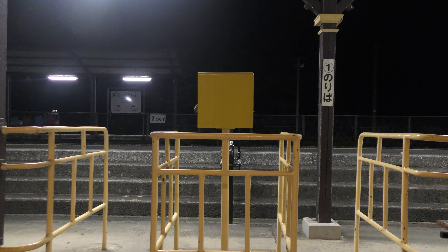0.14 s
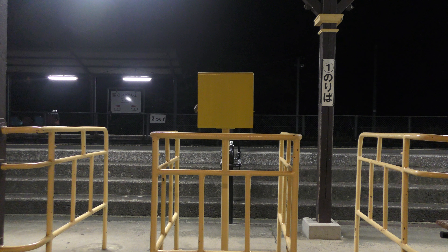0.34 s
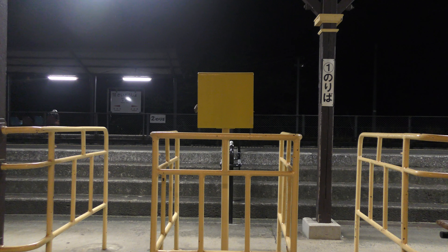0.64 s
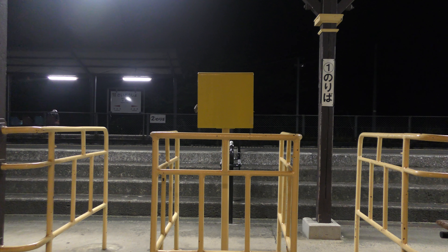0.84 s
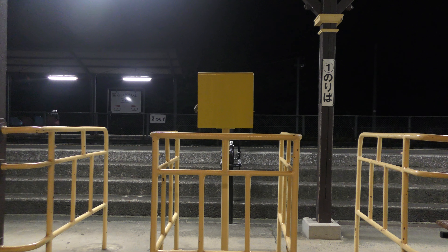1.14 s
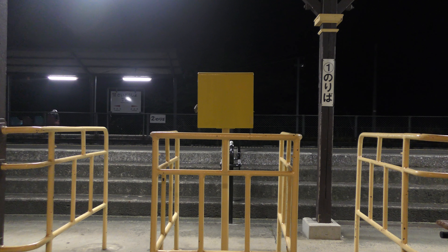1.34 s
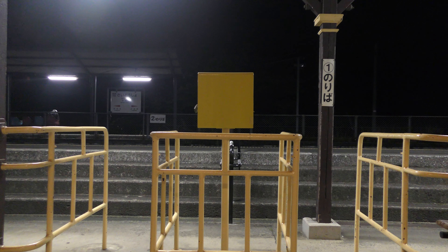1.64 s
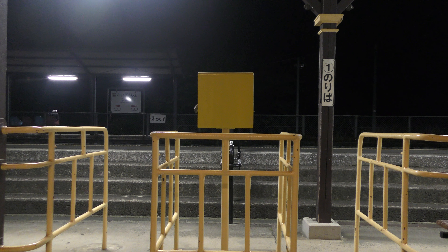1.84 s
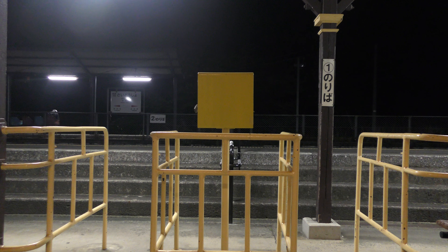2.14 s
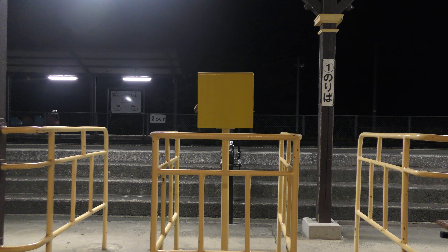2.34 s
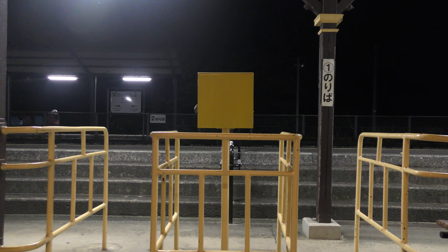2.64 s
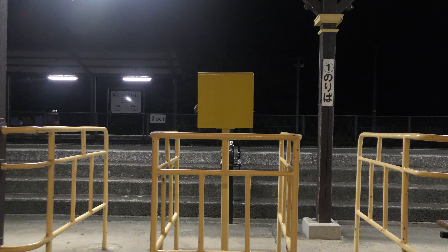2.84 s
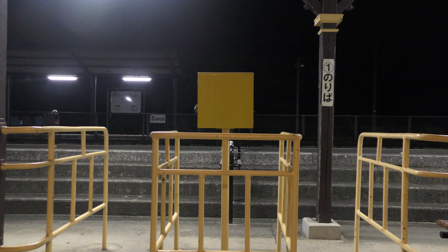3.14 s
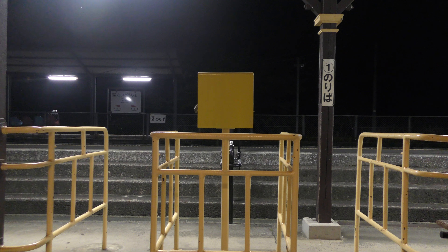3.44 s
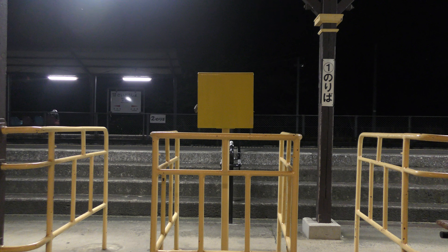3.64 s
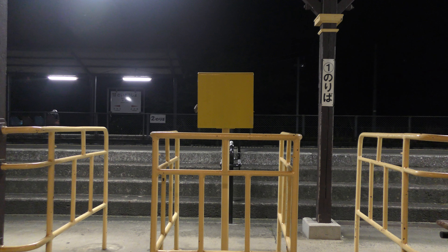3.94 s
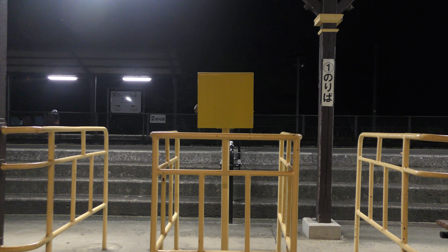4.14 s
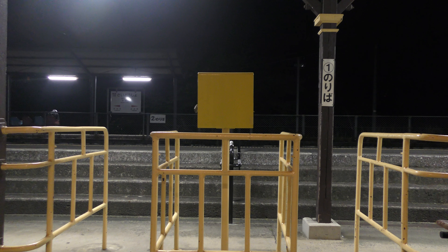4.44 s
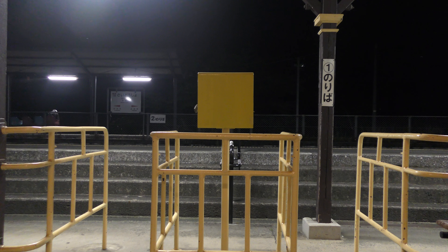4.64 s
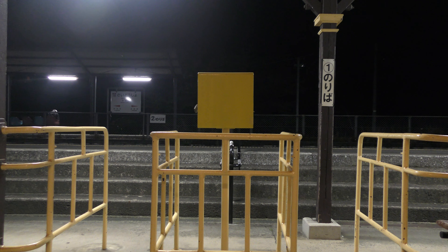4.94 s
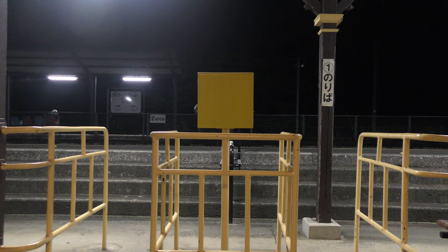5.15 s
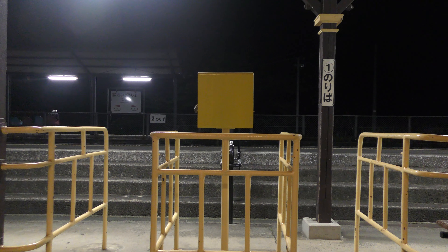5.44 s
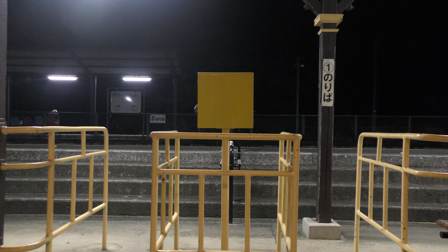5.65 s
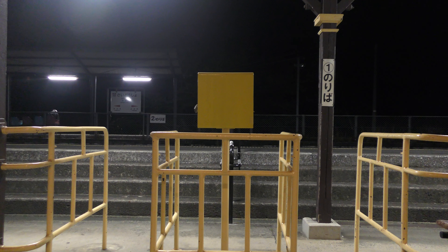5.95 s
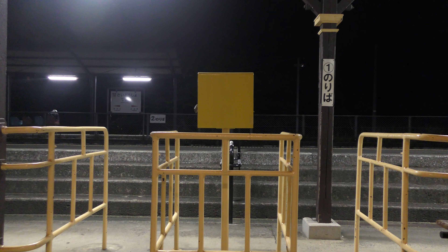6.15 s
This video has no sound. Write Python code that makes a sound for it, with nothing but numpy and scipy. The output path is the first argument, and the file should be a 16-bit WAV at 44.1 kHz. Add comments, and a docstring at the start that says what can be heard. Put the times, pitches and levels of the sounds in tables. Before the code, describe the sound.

Steady night ambience in the open: tree crickets trilling, higher ground crickets sizzling, a faint rasping buzz near the top of hearing, and a quiet wavering fan hum in soft, wide air. Over this a near cricket, almost centred, chirps in three regular runs separated by brief gaps, its first chirp in each run shorter and softer. Distant crickets answer hazily. Still stereo microphone, slight reflections from concrete.

```python
"""Night crickets at a country platform

Night on an empty country railway platform. A field cricket close by sings three phrases of wing-stroke chirps,
echoed by the ground and the steps. Further off sing more field crickets, a chorus of tree crickets, high-trilling
ground crickets and a thin katydid buzz. Cricket strokes and trills are gliding sine tones; the katydid is pulsed
noise. Wavering sines make the hum of a cooling fan, and filtered noise the faint rush of the night air."""
import sys
import numpy as np
from scipy import signal
from scipy.fft import rfft, irfft
from scipy.io import wavfile
from scipy.ndimage import uniform_filter1d

SR = 44100
rng = np.random.default_rng(int(sys.argv[2]) if len(sys.argv) > 2 else 0)


def dump(signal):
    """Clip the signal to [-1, 1] and save it as 16-bit WAV at the path in sys.argv[1]."""
    limited = np.clip(np.atleast_2d(signal).T, -1, 1)
    pcm = np.round(limited * 32767).astype(np.int16)
    wavfile.write(sys.argv[1], SR, pcm)


N = 277830  # length in samples
T = np.arange(N) / SR  # time in seconds
FREQS = np.fft.rfftfreq(N, 1 / SR)  # spectrum frequencies in Hz
LEFT_RIGHT = np.array([[1], [-1]])  # a side signal has opposite signs left and right


def undb(db):
    """Turn decibels into gain."""
    return 10 ** (np.asarray(db) / 20)


def level(x, db):
    """Set the rms level (average strength) in dB."""
    return x * undb(db) / np.sqrt(np.mean(x ** 2))


def curve(rows):
    """Join (seconds, value) rows by straight lines."""
    return np.interp(T, *np.transpose(rows))


def colour(x, points):
    """Filter by a (Hz, dB) spectrum, joined along a logarithmic pitch scale."""
    hz, db = np.transpose(points)
    gain = undb(np.interp(np.log(FREQS + 1), np.log(hz), db))
    return irfft(rfft(x) * gain, N)


def walk(rate):
    """Smooth random drift with an rms size of 1, heading for about `rate` new values per second."""
    size = int(SR / rate)
    steps = np.repeat(rng.standard_normal(N // size + 2), size)
    smooth = uniform_filter1d(steps, size)
    return level(smooth[rng.integers(size):][:N], 0)


def pan(x, db):
    """Place a sound by its left minus right level in dB."""
    return x * undb(np.array([[db], [-db]]) / 2)


def add(out, s, sound):
    """Mix a sound in at a time in seconds."""
    start = int(np.clip(s * SR, 0, N))
    out[start:start + len(sound)] += sound[:N - start]


def scatter(x, t60, side_db):
    """Dense reflections from grass, walls and roof, in stereo, fading by 60 dB in t60 seconds."""
    t = T[:SR // 2]
    envelope = undb(-60 * t / t60) * (1 - np.exp(-t / 0.0018))
    mid, side = rng.standard_normal((2, len(t))) * envelope
    response = mid + undb(side_db) * side * LEFT_RIGHT
    response = response / np.sqrt(np.sum(response ** 2) / 2)
    return signal.fftconvolve(x[None], response, axes=1)[:, :N]


def chorus(band, pulse_hz, duty, glide, jitter, spread_db, crowd_db, count):
    """Many trilling insects, each with its own pitch, wing rate and place; every pulse falls in pitch."""
    hz, db = np.transpose(band)
    # more singers take the pitches where the band is strong
    census = np.cumsum(undb(np.interp(FREQS, hz, db, left=-400, right=-400) / 2))
    pitches = np.interp((np.arange(count) + .5) / count, census / census[-1], FREQS)
    song = np.zeros((2, N))
    for k, pitch in enumerate(pitches):
        rate = pulse_hz * rng.uniform(.65, 1.35) * (1 + .05 * walk(12))
        wing_cycle = (np.cumsum(rate) / SR + rng.random()) % 1
        closure = np.minimum(wing_cycle / duty, 1)  # silent for the rest of each cycle
        tone_hz = pitch * (1 + glide * (.5 - closure) + jitter * walk(260))
        trill = np.sin(np.pi * closure) * np.sin(2 * np.pi * np.cumsum(tone_hz) / SR)
        song += pan(trill, (-1) ** k * spread_db * rng.uniform(0.82, 2.1))
    # the countless farther singers merge into a smooth sizzle
    crowd = level(colour(rng.standard_normal(N), band), crowd_db)
    return level(level(colour(song, band), 0) + crowd, 0)


# Pitch spread of the tree crickets. Each row: pitch in Hz, relative strength in dB.
TREE_BAND = [(3100, -34), (3400, -13), (3600, -4), (3850, -0.5), (4100, -4), (4260, -14), (4600, -32)]
# Slow swell of the tree crickets. Each row: time in seconds, level in dB before a small random sway.
TREE_SWELL = [(0, -58), (1.5, -56.5), (2.1, -54.5), (3.9, -56.5), (6.3, -54)]


def tree_crickets(sway_db=1.27):
    """Low trills with slow wing pulses, swelling and swaying in level."""
    trills = chorus(TREE_BAND, pulse_hz=43.93, duty=.85, glide=.025, jitter=.013,
                    spread_db=6.0, crowd_db=-5.5, count=16)
    return trills * undb(curve(TREE_SWELL) + sway_db * walk(9))


# Pitch spread of the ground crickets. Each row: pitch in Hz, relative strength in dB.
GROUND_BAND = [(6700, -32), (7500, -15), (7900, -5), (8250, -3), (8650, 0), (8880, -8), (9150, -15),
               (10000, -17), (10600, -36)]


def ground_crickets(db=-54.0, sway_db=0.4):
    """Higher trills from faster wing pulses with clear gaps between closures."""
    trills = chorus(GROUND_BAND, pulse_hz=115.1, duty=0.44, glide=.035, jitter=.014,
                    spread_db=2.0, crowd_db=0.5, count=16)
    return trills * undb(db + sway_db * walk(18))


# Pitch spread of the thinnest trillers. Each row: pitch in Hz, relative strength in dB.
THIN_BAND = [(9500, -20), (10200, -4.5), (10450, 0.5), (10800, -3), (11200, -15), (11800, -34.5)]


def thin_trillers(db=-66.0):
    """A few very high, faint trills made by the same wing pulsing."""
    trills = chorus(THIN_BAND, pulse_hz=68.9, duty=0.57, glide=.015, jitter=0.011,
                    spread_db=4, crowd_db=-4, count=6)
    return trills * undb(db)


# Colour of the katydid's rasp. Each row: frequency in Hz, relative strength in dB.
KATYDID_BAND = [(12500, -36), (14000, -7), (14800, 5), (15400, 7), (16000, -9)]


def katydid(buzz_hz=188, db=-66):
    """A very high rasp of noise, pulsing with each fast wing beat."""
    beat = np.sin(2 * np.pi * np.cumsum(buzz_hz * (1 + .002 * walk(1.5))) / SR)
    # noise shared by both ears, plus some separate noise for each
    rasp = rng.standard_normal(N) + 0.83 * rng.standard_normal((2, N))
    pulsed = rasp * (1 + beat / 2 / np.sqrt(2))
    return level(colour(pulsed, KATYDID_BAND), db)


# Fan and motor tones. Each row: average pitch in Hz, typical rms level in dB.
HUM = [(121, -71), (335, -68), (400.5, -73), (482.4, -59), (526.2, -67), (633, -73), (669, -75),
       (1002, -76), (1036, -82.5), (1090, -84)]


def fan(waver_db=1.58, drift=0.00202):
    """Steady motor and blade tones whose pitch and level waver slightly."""
    out = np.zeros((2, N))
    for hz, db in HUM:
        phase = 2 * np.pi * np.cumsum(hz * (1 + drift * walk(9))) / SR
        tone = np.sqrt(2) * np.sin(phase)
        out += pan(tone * undb(db + waver_db * walk(7)), .8)
    return out


# Colour of the rush. Each row: frequency in Hz, relative strength in dB per Hz.
AIR = [(20, -14.5), (55, -4.5), (125, 0.5), (230, 0.5), (440, -2), (600, -8), (800, -12), (1050, -5.5),
       (1600, -8.5), (3000, -12.5), (4600, -12.5), (6500, -18), (12500, -18.5), (16000, -24.5)]
# Width of the rush. Each row: frequency in Hz, side (left-right difference) relative to middle in dB.
AIR_SIDE = [(30, 10.5), (70, -6), (140, -2.5), (350, -5.5), (800, -9.5), (1300, -5), (3000, -5),
            (7000, -10), (14000, -5.5)]


def air(db=-53.0, flutter_db=0.2):
    """Wide, soft rush of the fan and the distant town, made of filtered noise."""
    mid, side = rng.standard_normal((2, N))
    rush = mid + colour(side, AIR_SIDE) * LEFT_RIGHT
    return level(colour(rush, AIR), db) * undb(flutter_db * walk(5.4))


STROKE_S, STROKE_GAP_S = .0092, .01345  # usual wing closure length, time from one closure to the next
WING_HZ, WING_WIDTH_HZ = 5152, 264  # near cricket's wing resonance and its width


def stroke(shape, pitch, octave_db=-19, third_db=-39, rasp=0.098, direct=0.02, scrape_db=-38):
    """The scraper slows along the file, so the tone falls through the wing's resonance; uneven teeth roughen it."""
    duration = SR * STROKE_S * (1 + 0.045 * rng.standard_normal())
    u = np.arange(int(1.5 * SR * STROKE_S)) / duration  # share of the stroke done
    share, hz, size = np.transpose(shape)
    teeth = level(uniform_filter1d(rng.standard_normal((2, len(u))), size=24), 0)
    speed = pitch * (1 + 0.0054 * rng.standard_normal())
    phase = 2 * np.pi * np.cumsum(speed * np.interp(u, share, hz)) / SR + rasp * teeth[0]
    swing = np.interp(u, share, size, right=0).clip(0) * (1 + rasp * teeth[1])
    drive = swing * np.sin(phase)
    # the wing keeps ringing and beats against the sinking tooth rate
    wing = signal.lfilter(*signal.iirpeak(WING_HZ * pitch, WING_HZ / WING_WIDTH_HZ, fs=SR), drive)
    octave = undb(octave_db) * np.sin(2 * phase)
    third = undb(third_db) * np.sin(3 * phase)
    overtones = swing * np.sin(np.pi * u) * (octave + third)
    noise = signal.lfilter(*signal.iirpeak(6000, 5, fs=SR), rng.standard_normal(len(u)))
    scrape = level(noise, scrape_db + 2 * rng.standard_normal())
    return wing + direct * drive + overtones + swing * scrape


# One wing closure.
# Each row: share of the stroke from 0 to 1, pitch in Hz at pitch factor 1, relative swing from 0 to 1.
STROKE = [(0, 5550, 0.29), (.25, 5480, 0.38), (.45, 5360, 0.57), (.6, 5223, 0.79), (.75, 4820, 0.59),
          (.9, 4756, 1), (1, 4330, 0.02)]
# The flatter, softer first closure of a chirp. Each row: the same three columns.
FIRST_STROKE = [(0, 5435, 0.32), (.25, 5390, 0.24), (.45, 5240, 0.51), (.6, 4980, 0.52), (.75, 4920, 0.8),
                (.9, 4670, 0.7), (1, 4549, 0.3)]


def chirp(strokes, pitch, swell_db=0.18):
    """A quick run of wing closures, with a slight swell and random differences in strength and timing."""
    out = np.zeros(int((strokes + 1) * STROKE_GAP_S * SR))
    for k in range(strokes):
        size, late = rng.standard_normal(2)
        sound = stroke(STROKE if k else FIRST_STROKE, pitch)
        add(out, k * STROKE_GAP_S + 0.00018 * late, sound * undb(swell_db * k + 1.6 * size))
    return level(out, 0)


# Phrases of distant field crickets.
# Each row: start in seconds, end in seconds, time between chirp starts in seconds,
# wing resonance in Hz, chirp level in dB before distance is added.
FAR_PHRASES = [(.04, 2.3, 0.15, 5330, -64), (1.3, 3.1, .131, 5310, -63), (3.9, 5.4, 0.16, 5330, -67),
               (4.49, 6.3, 0.15, 5360, -63), (5, 6.3, .16, 5230, -66)]


def far_crickets(count=4, direct=0.77, wet=1.0):
    """The same song from further off, each singer at its own pace and blurred by distance."""
    song = np.zeros(N)
    for start, end, period, hz, db in FAR_PHRASES:
        for s in np.arange(start, end, period):
            add(song, s, undb(db) * chirp(count, hz / WING_HZ))
    return direct * song + wet * scatter(song, t60=1.0, side_db=-4)


STROKES, OPENING_STROKES = 4, 3  # wing strokes in a usual chirp and in the one that opens a phrase
CHIRP_DB, OPENING_DB, CHIRP_SCATTER_DB = -40, -.9, 0.58  # usual level, change for the opener, spread
TIRING_POWER = 5  # a high power keeps most of the slowing for the end


def phrase(start, chirps, rest, drag):
    """Yield (s, strokes, dB) per chirp: a short, soft opener, then an even beat that drags as the singer tires."""
    s = start
    for k in range(chirps):
        strokes, db = (STROKES, CHIRP_DB) if k else (OPENING_STROKES, CHIRP_DB + OPENING_DB)
        yield s, strokes, db + CHIRP_SCATTER_DB * rng.standard_normal()
        s += strokes * STROKE_GAP_S + rest + drag * (k / (chirps - 1)) ** TIRING_POWER


# Phrases of the near cricket.
# Each row: start in seconds, number of chirps, rest between chirps in seconds,
# lengthening of the rest by the end in seconds.
NEAR_PHRASES = [(.0738, 13, .07395, .0035), (2.2469, 11, .0737, 0), (4.2319, 13, .07292, .006)]
# Reflections from the ground, railings and steps.
# Each row: delay in seconds, level in dB relative to the song, left minus right level in dB.
ECHOES = [(.004651, -19, 0), (.004901, -7.5, -.8), (.007119, -16, 1), (.011032, -19.5, -1),
          (.015147, -15, -1), (.021042, -16, 1)]
# Colour of the scattered tail. Each row: frequency in Hz, gain in dB before the tail is turned down.
TAIL_COLOUR = [(4800, -1), (5100, 3.5), (5400, 10.5), (6000, 20), (10000, 5)]
NEAR_PAN_DB = -.5  # left minus right level


def near_cricket(tail_db=-14):
    """The close singer, with its distinct delayed echoes and a short, brighter tail."""
    song = np.zeros(N)
    for row in NEAR_PHRASES:
        for s, strokes, db in phrase(*row):
            add(song, s, undb(db) * chirp(strokes, 1))
    # turning the phase of the spectrum delays each echo exactly
    paths = sum(pan(np.exp(-2j * np.pi * FREQS * delay), side) * undb(db) for delay, db, side in ECHOES)
    echoes = irfft(rfft(song) * paths, N)
    tail = scatter(colour(song, TAIL_COLOUR), t60=0.2, side_db=-8.5)
    return pan(song, NEAR_PAN_DB) + echoes + undb(tail_db) * tail


def scene():
    """All singers over the hum and the air."""
    choruses = tree_crickets() + ground_crickets() + thin_trillers() + katydid()
    background = fan() + air()
    return choruses + background + far_crickets() + near_cricket()


TOP_HZ = 15750  # upper limit of the treble


def record(dry):
    """Cut the top steeply with a smooth low-pass curve."""
    return irfft(rfft(dry) / np.sqrt(1 + (FREQS / TOP_HZ) ** 1400), N)


dry = scene()
out = record(dry)
dump(out)
```